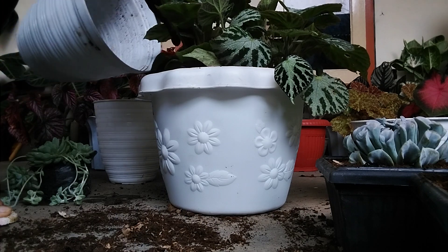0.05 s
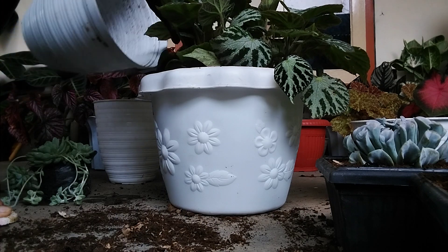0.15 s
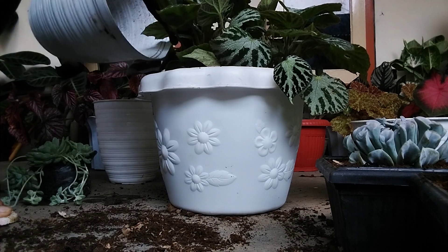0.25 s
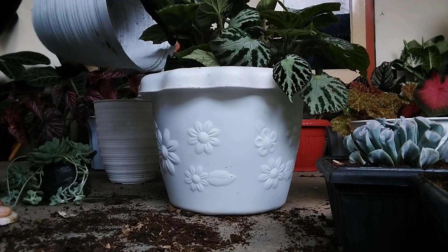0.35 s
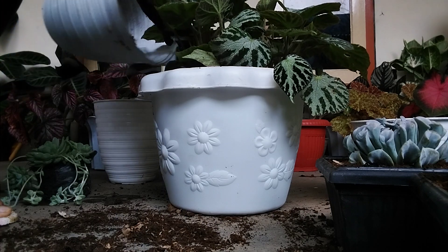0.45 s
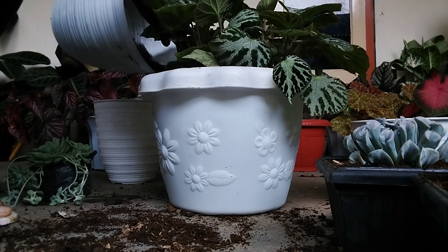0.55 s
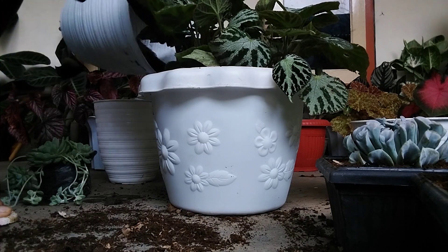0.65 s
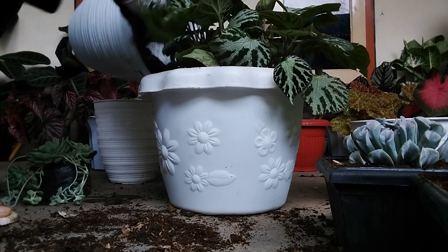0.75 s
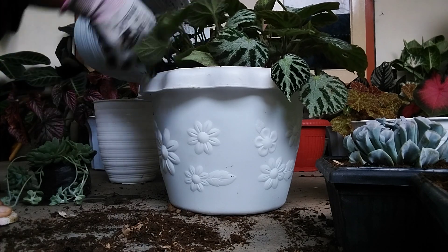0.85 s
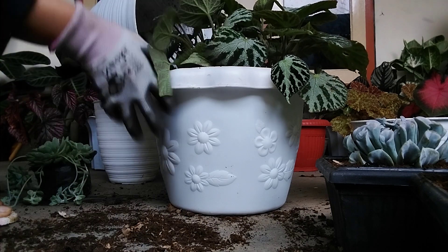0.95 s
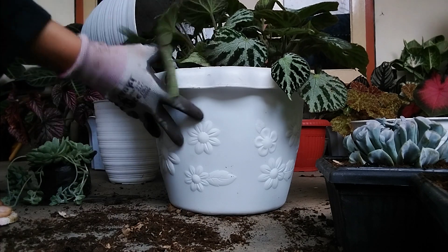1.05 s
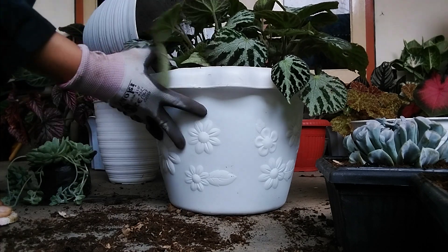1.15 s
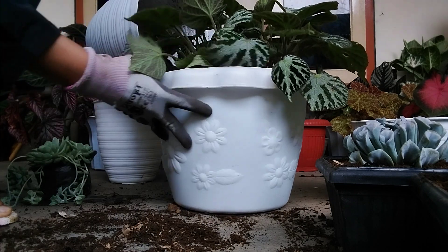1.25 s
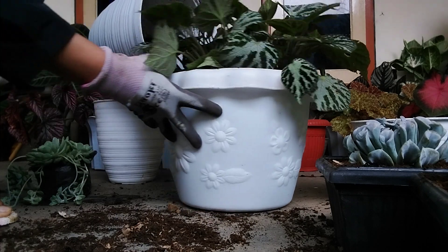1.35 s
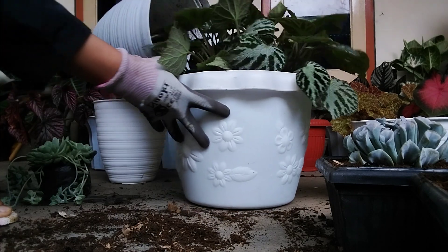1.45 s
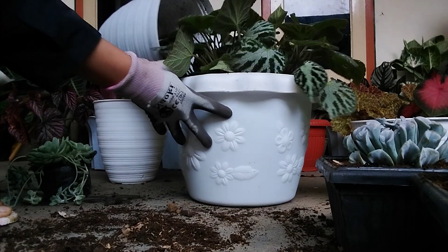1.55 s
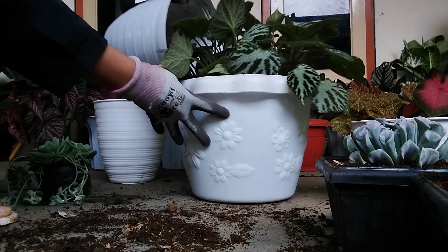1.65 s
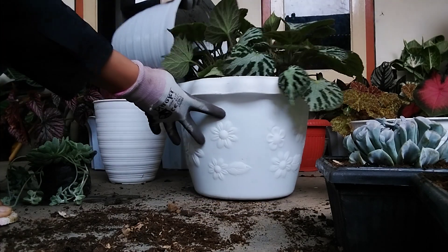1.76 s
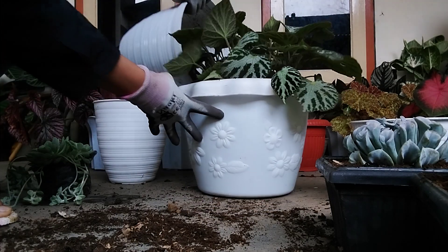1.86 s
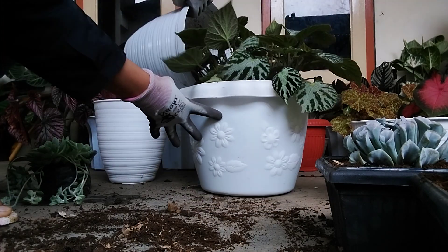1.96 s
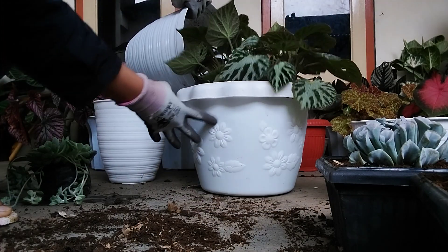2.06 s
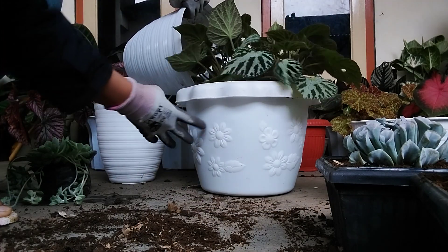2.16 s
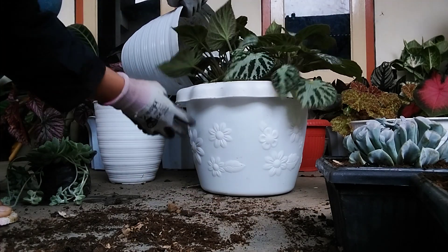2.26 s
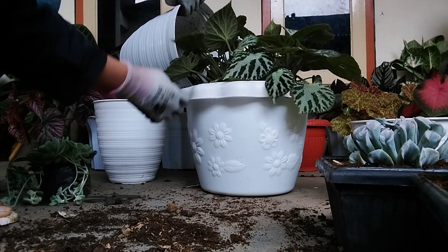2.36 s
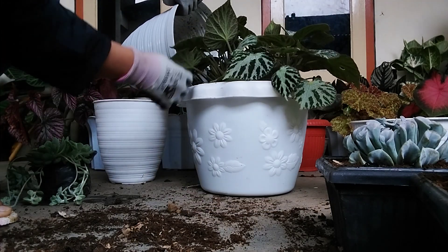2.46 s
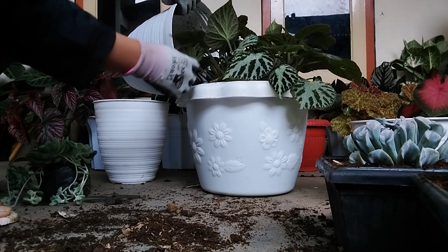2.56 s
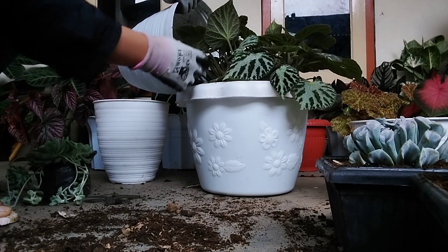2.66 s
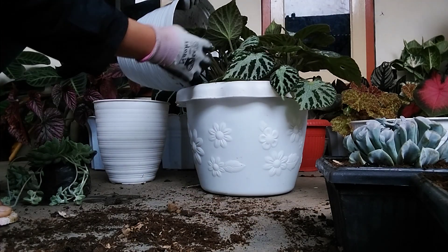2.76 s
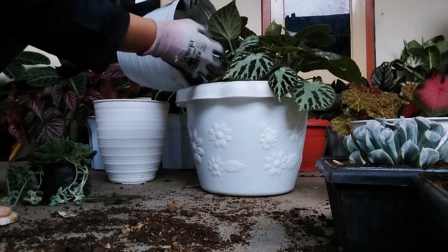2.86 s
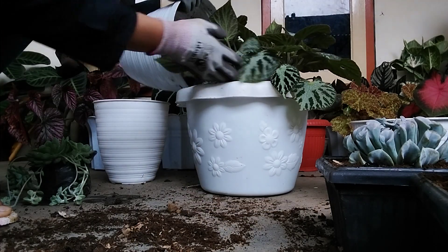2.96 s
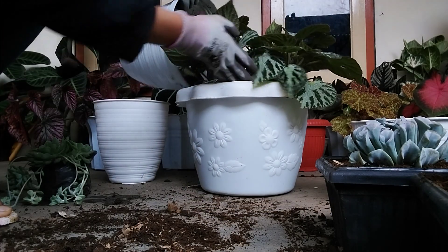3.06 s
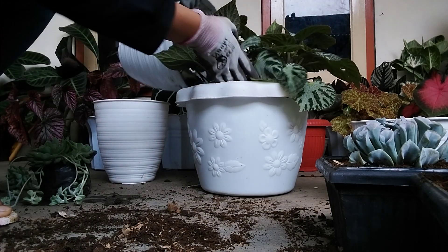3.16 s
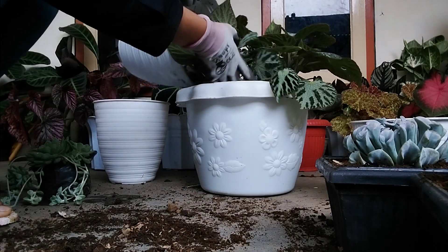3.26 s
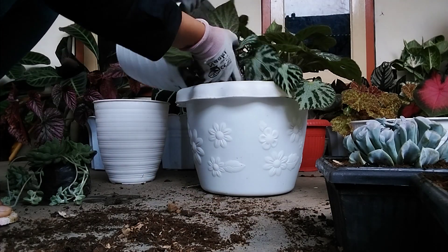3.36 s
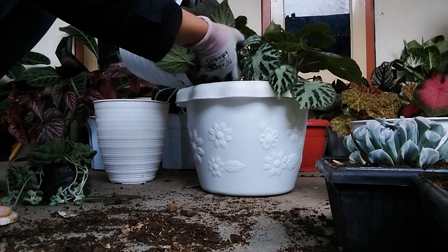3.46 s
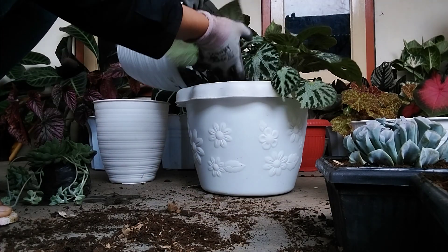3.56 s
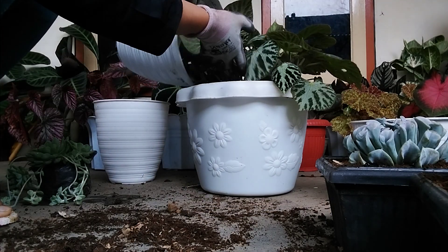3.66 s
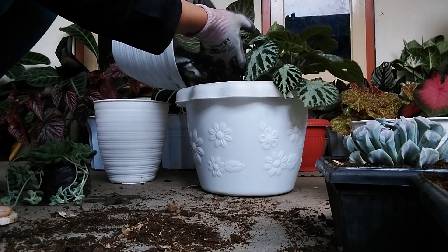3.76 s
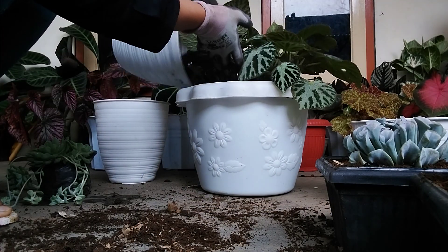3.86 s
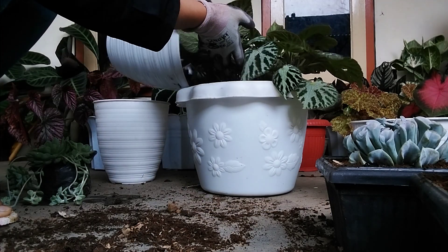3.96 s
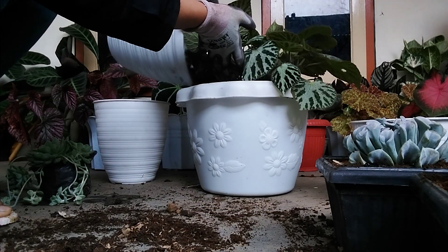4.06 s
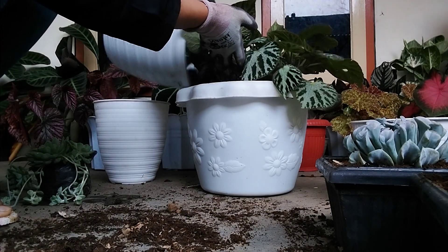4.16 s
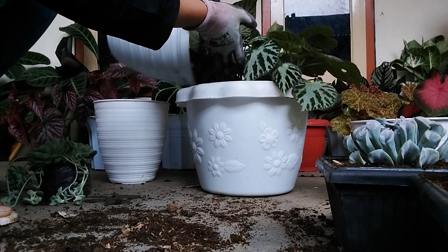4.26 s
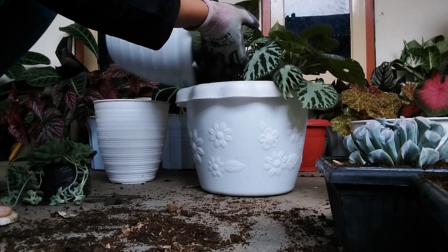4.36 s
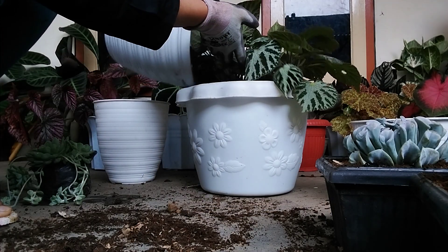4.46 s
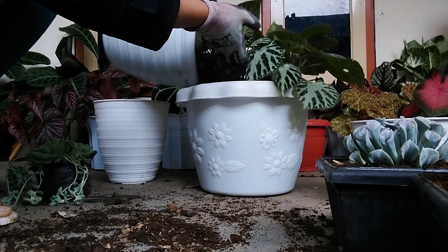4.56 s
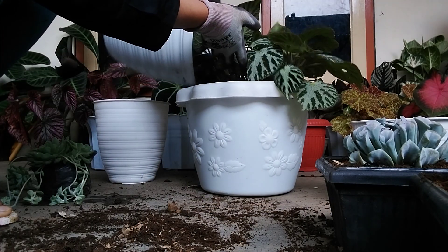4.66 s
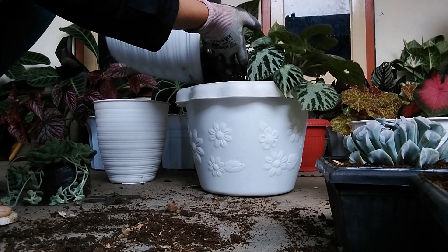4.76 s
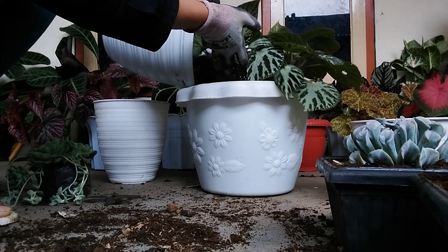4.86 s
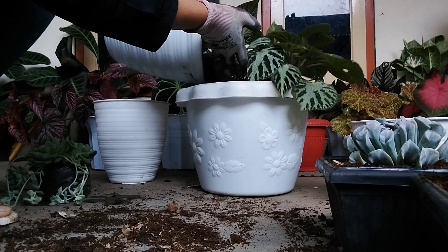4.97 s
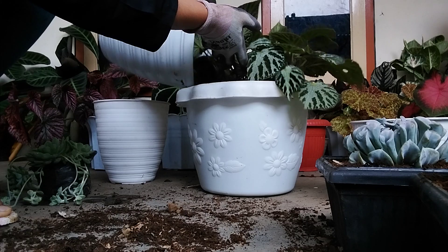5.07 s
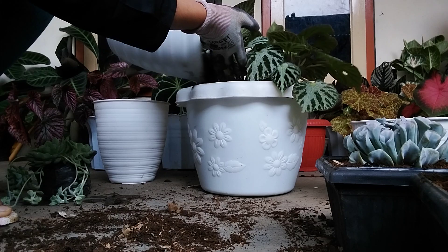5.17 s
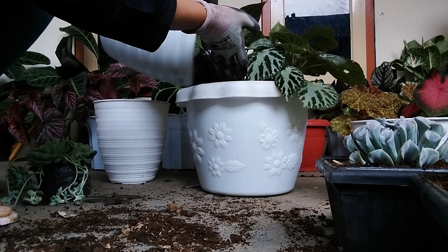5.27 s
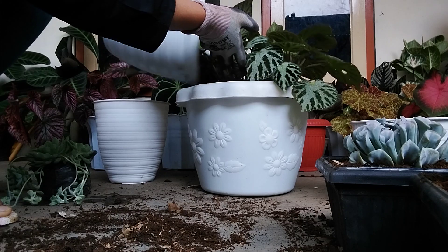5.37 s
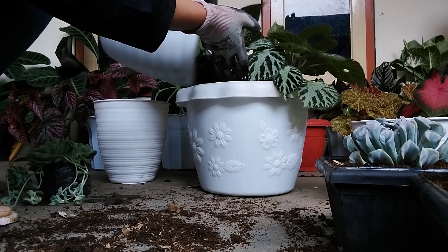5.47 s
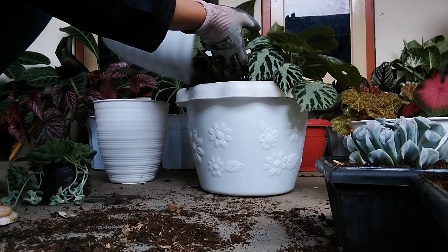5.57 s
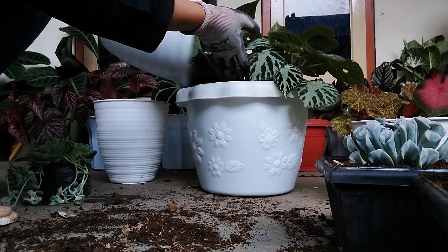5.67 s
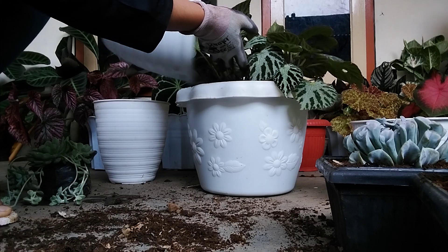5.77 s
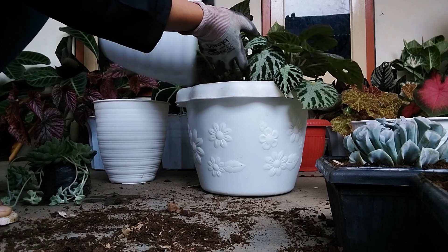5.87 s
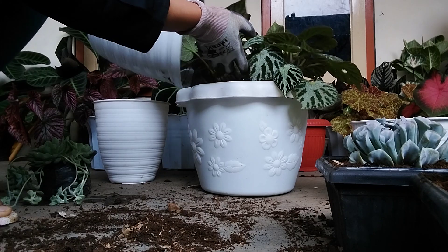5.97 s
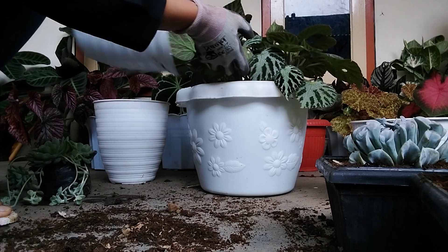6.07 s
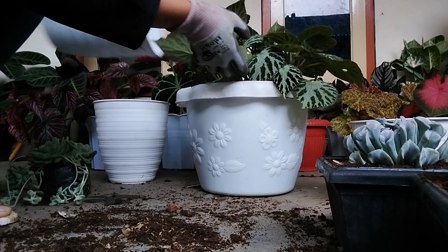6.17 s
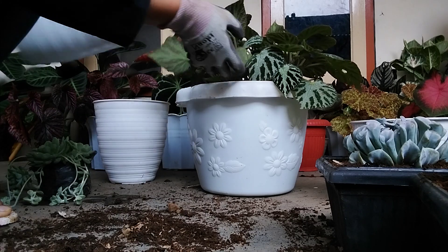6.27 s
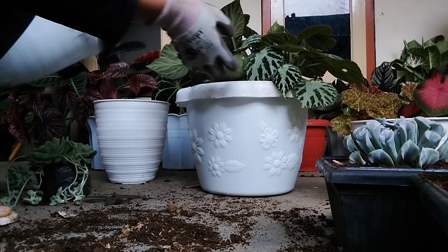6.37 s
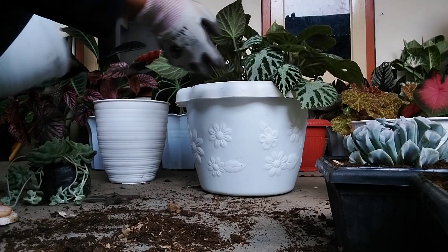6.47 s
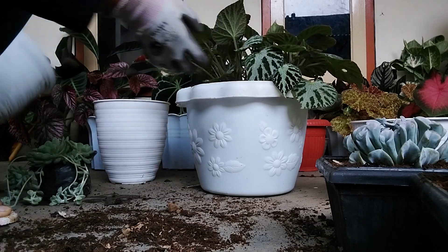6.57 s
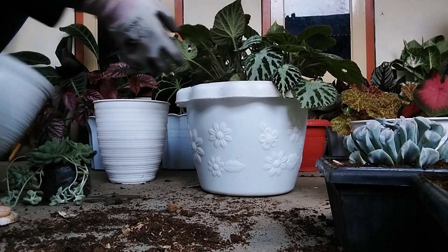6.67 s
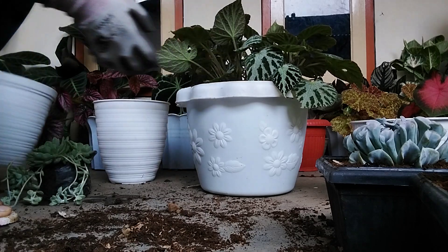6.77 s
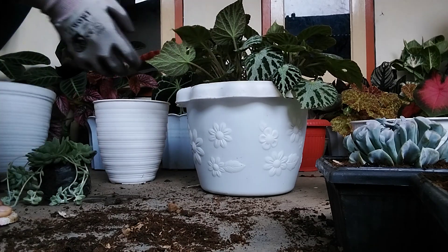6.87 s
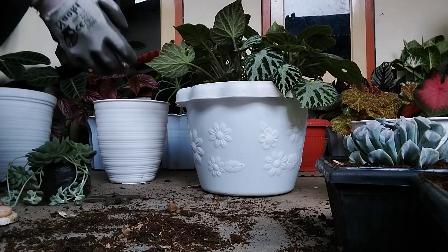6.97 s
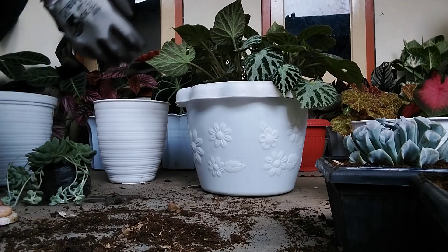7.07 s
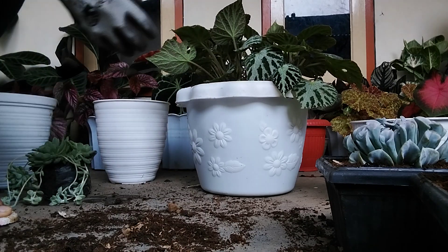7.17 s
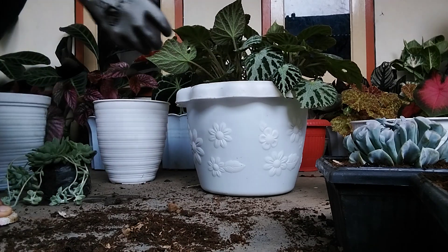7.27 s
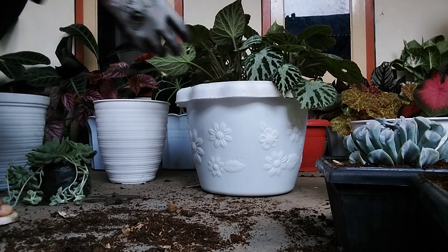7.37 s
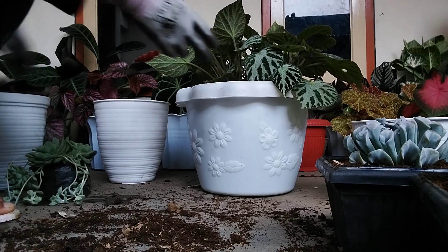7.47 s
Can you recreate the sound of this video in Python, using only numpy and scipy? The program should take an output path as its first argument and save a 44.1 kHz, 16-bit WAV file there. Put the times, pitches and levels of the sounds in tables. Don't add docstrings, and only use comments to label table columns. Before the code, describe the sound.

Quiet repotting heard close, in wide stereo. A few soft pats and crumbs come first, over faint air and swelling motor hum. Then a loud gritty scrape with sharp cracks and a hollow low body, under a second long. A pause, then about fifteen uneven, padded plastic thumps, each followed by trickling soil and rustling. It ends with several hollow knocks as an empty pot lands on grit and wobbles, with a short porch echo.

```python
import sys
import numpy as np
from scipy import signal
from scipy.fft import rfft, irfft
from scipy.io import wavfile

SR = 44100
rng = np.random.default_rng(int(sys.argv[2]) if len(sys.argv) > 2 else 0)


def to_linear_factor(level_db):
    exponent = np.asarray(level_db, float) / 20
    return 10 ** exponent


def to_wav(sig):
    pcm = np.clip(np.atleast_2d(sig), -1, 1) * 32767
    pcm = np.round(pcm).astype(np.int16)
    wavfile.write(sys.argv[1], SR, pcm.T)


N = 331191

# f/Hz, density level/dB
AIR = [(15, -68.5), (25, -46.5), (53, -18), (105, -10), (131, -27), (171, -19), (507, -41.5), (972, -47.5),
       (3870, -54.5), (11800, -46), (16300, -60)]
# t/s, level/dB
HUM = [(0.0, -74), (0.33, -55.5), (1.29, -60), (1.52, -45.5), (1.59, -51), (1.98, -47.5), (2.42, -54),
       (2.71, -74), (3.59, -50.5), (4.13, -65), (4.2, -57), (4.66, -54), (5.1, -86), (5.26, -57.5),
       (5.87, -65.5), (7.04, -61), (7.31, -48), (7.5, -53)]
HUM_TONES = 69.5, 98.5
# t/s, level/dB
HANDS = [(0, -68.5), (.36, -77), (.8, -72.5), (1.25, -71), (2.2, -74), (2.45, -91), (2.97, -92.5),
         (3.02, -70.5), (3.78, -75.5), (4.2, -78), (4.6, -68.5), (5.07, -75.5), (5.5, -65), (6.0, -71.5),
         (6.3, -80), (6.7, -73), (7.0, -71.5), (7.51, -71)]
# peak t/s, 20 dB fade t/s, fine grit level/dB, leaf level/dB, crumb level/dB
BRUSHES = [(.41, .1, -77, -63.5, -87), (.52, 0.13, -54, -51, -64.5), (0.7, 0.1, -58, -52, -66),
           (.91, 0.27, -56.5, -60.5, -82), (1.19, .08, -71, -75, -67), (2.36, 0.1, -85, -84, -78),
           (2.6, 0.3, -95, -96, -77.5), (3.27, .16, -60.5, -69, -63), (3.47, 0.05, -64, -64, -64),
           (4.04, 0.08, -64.5, -74, -86), (4.25, .06, -58.5, -65, -74), (4.468, 0.07, -62, -58, -72),
           (4.66, 0.28, -70, -60.5, -67), (4.9, 0.14, -65, -63, -68), (5.35, 0.2, -59.5, -57.5, -57),
           (5.54, 0.16, -61, -60.5, -62.5), (5.67, 0.12, -61, -55, -60), (5.849, 0.15, -70.5, -60.5, -73.5),
           (6.346, 0.24, -77.5, -81, -92), (6.43, 0.11, -75, -71, -65), (6.79, 0.17, -69, -75.5, -73),
           (6.93, 0.08, -67, -69, -75.5)]
# level re tap/dB, 20 dB fade t/s
TRICKLE = [
    (-31.5, 0.1539),
    (-25, 0.08),
    (-19, 0.26),
    (-15, 0.26),
]
# f/Hz, density level/dB
FINE = [(1760, -18), (3000, -6.5), (3310, -14), (3580, -3), (4750, -2.5), (6870, -6.5), (8620, -8.5),
        (11200, -1), (15200, -13.5), (16300, -39.5)]
# f/Hz, density level/dB
CRUMBS = [(350, -24), (600, -10.5), (834, -17), (1290, -3), (1440, -4), (1950, -12.5), (2410, -1),
          (2980, -16.5), (4500, -27.5), (5850, -38.5), (9900, -120)]
# f/Hz, density level/dB
LEAVES = [(1500, -20), (2300, 3.5), (3600, -6.0), (5200, -21.5)]
MURMUR = [(100, -38.0), (150, 3), (210, 0), (350, 3.5), (480, -11), (700, -38.5)]
# t/s, peak level/dB, pan/dB
FAINT_CRUMBS = [(.0443, -54, -1), (.0897, -55, -2), (.287, -52, 2), (.3955, -50, 1), (.409, -54, 1),
                (.4599, -49, 0), (1.2416, -48, 0), (3.2014, -51, 0), (3.6329, -48, -2), (4.1537, -51, -6),
                (4.8546, -52, -3), (5.3949, -43, -3), (5.4582, -46, -3), (5.468, -48, -3),
                (5.4842, -43, -1), (5.506, -48, -3), (5.673, -42, -2), (6.3398, -56, -3), (6.4251, -57, -1),
                (6.695, -57, -2), (6.7244, -52, -3), (7.0911, -41, 4), (7.0986, -37, 3), (7.2767, -40, 0)]
# t/s, peak level/dB, pan/dB
CLEAR_CRUMBS = [(0.1710, -39, 2), (0.1989, -51, 5), (0.2193, -37, 6), (0.2364, -34, 6), (0.5018, -39, 5),
                (0.5154, -30, 1.5), (0.6384, -44, 4), (0.651, -28, 3), (0.709, -40, 3), (0.87, -41, -14),
                (1.263, -36, 5),
                (2.992, -44, -4), (3.0193, -32.5, 3), (3.4196, -22, 5), (3.835, -40, 3), (3.854, -36.5, 5),
               (4.0638, -41, 0), (4.2764, -28.5, -9), (4.4995, -40, -5), (4.592, -50, -9),
               (4.6915, -28, -3), (4.7758, -33, -8), (4.9344, -39, 2), (5.1428, -30, 2),
               (5.1642, -37.5, -9), (5.3967, -68, -14), (5.592, -32, 4), (5.6172, -33.5, -10.5),
               (5.6609, -41, -6), (5.822, -38, -6), (6.0241, -28.5, -4), (6.6174, -55, 1), (6.63, -42, -7),
               (6.7633, -49, -6), (6.9183, -40, -7), (7.0766, -40.5, 5)]
# t/s, slap level/dB, thump level/dB, knock
# level/dB, wall pitch f/Hz
NUDGES = [
    (0.172, -36.5, -52, -43, 230),
    (0.2184, -34.5, -50, -57, 308),
    (0.4842, -45.5, -56, -70, 227),
    (0.5146, -53, -55.5, -74, 370),
    (0.652, -60, -56, -55, 240),
    (0.8724, -35, -38, -35, 237),
    (0.9213, -43, -38.5, -46, 232),
    (1.1627, -68, -52.5, -56.5, 210),
    (2.195, -73, -50, -79, 263),
]
# t/s, slap level/dB, thump level/dB, knock level/dB, wall pitch f/Hz
TAPS = [(2.9915, -50, -44, -43, 288), (3.018, -32.5, -46.5, -52, 278), (3.2019, -47, -35, -42, 318),
        (3.4184, -21, -28, -29, 359), (3.4345, -31, -34.5, -29, 380), (3.6334, -35, -28.5, -42, 292),
        (3.854, -28.5, -28, -29, 271), (4.0644, -26.5, -29.5, -30.5, 270), (4.275, -22, -27.5, -31, 322),
        (4.4991, -39.5, -35, -47, 295), (4.6916, -35, -37.5, -46, 350), (4.7767, -42.5, -61, -56.5, 340),
        (4.9361, -34, -42.5, -65, 330), (5.143, -26, -33, -36.5, 356), (5.5931, -27, -39, -36, 369),
        (5.9242, -48, -53, -49, 385), (6.025, -27.5, -40.5, -37, 360), (6.0399, -31.5, -32.5, -37.5, 270)]
# f/Hz, level/dB, t60/s
WALL = [(1178, 10.5, 0.032), (1400, -6, 0.0097), (2080, -17, 0.013), (2227, 11.5, 0.023), (2430, 8, 0.017),
        (3410, 3, 0.0053), (4830, -17, 0.0079)]
# t/s, peak level/dB, pitch f/Hz
REBOUNDS = [(.184, -50, 253), (.664, -44, 400), (3.213, -40, 300), (3.644, -28, 300), (3.867, -31, 330),
            (4.075, -28, 300), (4.292, -25, 340), (4.4995, -32, 330), (4.511, -31, 310), (4.706, -34, 300),
            (4.945, -38, 260), (5.159, -30, 370), (5.232, -40, 340), (5.304, -45, 358), (5.395, -44, 250),
            (5.608, -36, 377), (6.074, -32, 280), (6.115, -38, 260)]
# t/s, level/dB
DRAG = [
    (1.288, -37.5),
    (1.36, -36),
    (1.45, -36.5),
    (1.5, -30),
    (1.76, -31),
    (1.85, -34.5),
    (1.875, -28),
    (2.075, -35),
    (2.2, -65.5),
]
# f/Hz, density level/dB
SLIPS = [(60, -18.5), (200, -0.5), (800, -3), (3000, -8.5)]
# f/Hz, width/Hz, level/dB
BIG_POT = [(42, 30, -14), (132, 55, -9.5), (197, 40, -11), (260, 50, -9), (350, 70, -11), (500, 130, -12.5),
           (670, 130, -8), (1053, 260, -16.5), (1403, 160, -17.5)]
# f/Hz, density level/dB
GRIT = [(880, -42), (1500, -11), (1610, -12.5), (1740, -9), (2420, -4), (3800, -9), (5020, -5), (6700, -5),
        (7630, -0.5), (8690, -9), (11500, 1), (15200, -7), (16300, -25)]
# t/s, peak level/dB, pan/dB
CRACKS = [(1.289, -14, 5), (1.3226, -21.5, -0.5), (1.3383, -27.5, -0.5), (1.3477, -17, 8.5),
          (1.3628, -11.5, 1.5), (1.3664, -26.5, -7.5), (1.4196, -20, -6), (1.4744, -19, -1),
          (1.4825, -14.5, 1), (1.488, -14, 1.5), (1.7374, -17, -4), (1.742, -13, -6), (1.7705, -17, -3.5),
          (1.7837, -18, -3.5), (1.8597, -25, 2), (1.8682, -8, -3), (1.8723, -21.5, -7.5),
          (1.8824, -21.5, 2.5), (1.888, -17.5, -9.5), (1.8948, -16, 3.5), (1.9032, -7, -2.5),
          (1.9064, -10.5, -3), (1.924, -17, -5), (1.9629, -26, 1), (1.975, -19, -4), (1.9863, -17, 9),
          (2.0635, -23, -5)]
# t/s, level/dB
JERKS = [(1.34, -36), (1.41, -37), (1.455, -33), (1.49, -29), (1.555, -28), (1.585, -28), (1.62, -29),
         (1.66, -28), (1.72, -27), (1.785, -28), (1.872, -26), (1.912, -27), (1.95, -28), (2.05, -30),
         (2.08, -39)]
# t/s, f/Hz
BELLY = [(1.3, 245), (1.4, 266), (1.5, 263), (1.56, 268), (1.8, 262), (1.87, 252), (1.96, 255), (2.05, 284),
         (2.2, 270)]
# t/s, peak level/dB, pan/dB
CRUSHES = [(1.4874, -27, 0), (1.5243, -26, 0), (1.565, -28, 0), (1.594, -27, 0), (1.647, -22, 0),
           (1.7363, -30, 0), (1.8675, -26, 0), (1.9018, -19, 0), (1.9314, -25, 0), (1.9728, -29, 0)]
# peak t/s, 20 dB fade t/s, level/dB, f/Hz
SQUEAKS = [
    (2.36, .09, -82, 2280),
    (2.61, .1, -88, 1430),
    (6.435, .05, -68, 1130),
    (7.41, .08, -52, 1400),
]
# t/s, level/dB
SCUFF = [(7.07, -76), (7.1, -49), (7.122, -45), (7.154, -63), (7.215, -39.5), (7.256, -50.5), (7.41, -48),
         (7.492, -61.5), (7.51, -46)]
# f/Hz, density level/dB
SCUFF_COLOUR = [(530, 4), (900, -4.5), (1620, -13.5), (1910, -19), (2340, -9), (2970, -14.5), (3120, -10.5),
                (4160, -7), (4860, -9.5), (9000, -19), (11700, -58), (19800, -120)]
# t/s, delay/ms, echo share
TILT = [
    (7.13, .45, .3),
    (7.17, .85, .7),
    (7.245, .55, .7),
    (7.28, .42, .15),
]
# t/s, peak level/dB, lowest mode level/dB, free ringing t/s, pitch share
SET_DOWN = [(7.1167, -12, -5, .02, 1.0), (7.152, -25, -8, .016, 1.1), (7.191, -25, -12, .008, .97),
            (7.202, -24, -20, .013, 1.05), (7.226, -31, -20, .015, 1.0), (7.2572, -12, -9, .029, 1.0),
            (7.308, -27, -8, .015, 1.07), (7.332, -27, -8, .012, .95), (7.35, -23, -25, .012, 1.0),
            (7.362, -19, -15, .01, 1.0), (7.3735, -14, -6, .014, 1.0), (7.4, -26, -12, .015, 1.03),
            (7.48, -33, -10, .015, 1.0)]
# f/Hz, level/dB, t60/s
SMALL_POT = [(232, 0.5, 0.11), (345.8, 4.5, 0.18), (385, -15, 0.022), (620, -14, .05), (930, -19, 0.04)]
# f/Hz, t60/s
PORCH = [(100, 0.74), (250, 0.41), (600, 0.36), (1500, 0.35), (4000, 0.35), (11000, 0.31)]
# f/Hz, likeness
LIKENESS = [(60, .93), (250, 0.87), (500, .96), (1000, .35), (3000, 0.041), (12000, 0.027)]
# f/Hz, left minus right level/dB
PORTS = [(60, -2.3), (250, -1.8), (700, -1.5), (2300, -3.5), (3500, -1), (5500, 3.5), (10500, -10),
         (14500, 0)]


def in_time(rows, outside=None):
    s, *columns = np.transpose(rows)
    return [np.interp(np.arange(N) / SR, s, column, outside, outside) for column in columns]


def at_hz(points, hz):
    known_hz, value = np.array(points).T
    return np.interp(np.log(hz), np.log(known_hz), value)


def bins_hz(n):
    return np.maximum(np.fft.rfftfreq(n, 1 / SR), 1)


def rms_one(x):
    return x / np.sqrt(np.mean(x ** 2) + 1e-20)


def decay(t, t60):
    return to_linear_factor(-60 * t / t60)


def lay(out, s, sound):
    at = round(s * SR)
    out[..., at:at + sound.shape[-1]] += sound


def drift(rate):
    r = np.exp(-2 * np.pi * rate / SR)
    slow = signal.lfilter([1], [1, -2 * r, r * r], rng.standard_normal(N + SR))
    return rms_one(slow[SR:])


def band_pass(x, low_hz, high_hz):
    return signal.sosfilt(signal.butter(2, [low_hz, high_hz], "band", fs=SR, output="sos"), x)


def shape(x, spectrum):
    n = x.shape[-1]
    return rms_one(irfft(rfft(x) * to_linear_factor(at_hz(spectrum, bins_hz(n))), n)) * np.std(x)


def colour(x, spectrum):
    n = x.shape[-1]
    alike = np.clip(at_hz(LIKENESS, bins_hz(n)), 0, 1)
    mid, side = rfft(x) * to_linear_factor(at_hz(spectrum, bins_hz(n)))
    both = np.sqrt(1 + alike) * mid + np.sqrt(1 - alike) * side * [[1], [-1]]
    return rms_one(irfft(both, n))


def grains(per_s, spread_db, smooth):
    struck = rng.random(N) < per_s / SR
    sizes = to_linear_factor(spread_db * np.minimum(rng.exponential(1, N), 4)) * struck
    envelope = rms_one(signal.lfilter([1], [1, -decay(1 / SR, 0.028)], sizes))
    return rng.standard_normal((2, N)) * (smooth + envelope)


def swells(s, db, rise_s, fall_s):
    steps = np.arange(0, N + 32, 32)
    t = steps[:, None] / SR - s
    power = to_linear_factor(db - 20 * np.where(t < 0, -t / rise_s, t / fall_s)) ** 2
    return np.interp(np.arange(N), steps, np.sqrt(power.sum(axis=1)))


def snaps(rows, t60):
    t = np.arange(int(.02 * SR)) / SR
    out = np.zeros((2, N + SR))
    for s, db, pan_db in rows:
        burst = rng.standard_normal((2, len(t))) * decay(t, t60)
        lay(out, s, to_linear_factor(db) * to_linear_factor([[pan_db / 2], [-pan_db / 2]]) * burst)
    return out[:, :N]


def wavering(hz, width_hz):
    phase = 2 * np.pi * np.cumsum(hz + width_hz * drift(width_hz)) / SR
    return to_linear_factor(2.5 * drift(width_hz)) * np.sin(phase)


def background():
    t = np.arange(N) / SR
    out = to_linear_factor(-63) * colour(rng.standard_normal((2, N)), AIR)
    swell_db, = in_time(HUM)
    for hz, level_db in zip(HUM_TONES, [swell_db, swell_db - 3]):
        phase = 2 * np.pi * (hz * t + np.cumsum(1.5 * drift(2.4)) / SR)
        out = out + to_linear_factor(level_db + 2.5 + 1.6 * drift(3.6)) * np.sin(phase)
    return out


def rustle():
    busy_db, = in_time(HANDS)
    at, fade_s, fine_db, leaf_db, crumb_db = np.transpose(BRUSHES)
    s, slap_db, thump_db, knock_db, _ = np.transpose(NUDGES + TAPS)
    hands_below_db = [0, -11, -10.5, -2.5]
    brushes_db = [fine_db, leaf_db, crumb_db, crumb_db + 1]
    taps_db = [slap_db, slap_db, knock_db, thump_db]
    jolt_s, swing_s, swing_db = 0.005, 0.04, -11
    gains = []
    for below_db, brush_db, tap_db, (loss_db, fall_s) in zip(hands_below_db, brushes_db, taps_db, TRICKLE):
        brush = swells(at, brush_db, 0.62 * fade_s, fade_s)
        trickle = swells(s, tap_db + loss_db, jolt_s, fall_s)
        swing = swells(s, tap_db + loss_db + swing_db, swing_s, jolt_s)
        gains.append(to_linear_factor(busy_db + below_db) + brush + trickle + swing)
    fine_gain, leaf_gain, crumb_gain, wall_gain = gains
    fine = colour(grains(per_s=260, spread_db=0.0, smooth=1.0), FINE)
    rough = grains(per_s=210, spread_db=2.0, smooth=0.7)
    crumbs = band_pass(colour(rough, CRUMBS), 450, 1400)
    leaves = colour(rough[::-1], LEAVES)
    coarse = leaf_gain * leaves + crumb_gain * crumbs
    wall = colour(rng.standard_normal((2, N)), MURMUR)
    return fine_gain * to_linear_factor(0.8 * drift(7.1)) * fine + to_linear_factor(0.5 * drift(4.7)) * coarse + wall_gain * wall


def single_crumbs():
    faint = shape(snaps(FAINT_CRUMBS, t60=0.012), FINE) * to_linear_factor(-7.0)
    clear = shape(snaps(CLEAR_CRUMBS, t60=0.016), FINE) * to_linear_factor(-9.5)
    return faint + clear


def taps():
    t = np.arange(int(.15 * SR)) / SR
    out = np.zeros(N + SR)
    for s, slap_db, thump_db, knock_db, hz in NUDGES + TAPS:
        thump = sum(to_linear_factor(db) * np.cos(2 * np.pi * hz * ratio * t) * decay(t, t60)
                    for ratio, db, t60 in [(.62, -3.5, 0.061), (1.0, 8, 0.042), (1.4, -10.5, 0.048)])
        thump = -thump * np.clip(t / 0.0028, 0, 1)
        stretch = 1 + 0.05 * rng.standard_normal()
        slap = 0
        for luck, (f, db, t60) in zip(rng.standard_normal(len(WALL)), WALL):
            mode = np.sin(2 * np.pi * f * (stretch + 0.02 * luck) * t)
            slap = slap + to_linear_factor(db + 2.0 * luck) * mode * decay(t, t60)
        low, middle, high = rng.standard_normal((3, len(t)))
        soil = (to_linear_factor(thump_db + 17.5) * band_pass(low * decay(t, 0.16), 120, 348)
                + to_linear_factor(knock_db + 3) * band_pass(middle * decay(t, 0.14), 750, 1460)
                + to_linear_factor(slap_db - 1.5) * band_pass(high * decay(t, 0.06), 1094, 2300))
        lay(out, s, to_linear_factor(thump_db + 1.0) * thump + to_linear_factor(slap_db - 18) * slap + soil)
    return band_pass(out[:N], 85, 9000)


def rebounds():
    t = np.arange(int(.1 * SR)) / SR
    out = np.zeros(N + SR)
    for s, db, hz in REBOUNDS:
        ring = sum(to_linear_factor(mode_db) * np.sin(2 * np.pi * hz * ratio * t)
                   for ratio, mode_db in [(1, 0), (1.45, -13.0), (.6, -1.5)])
        lay(out, s, to_linear_factor(db) * decay(t, .06) * np.clip(t / .002, 0, 1) * ring)
    return band_pass(out[:N], 90, 3000)


def body(x):
    out = 0
    for k, (hz, width, db) in enumerate(BIG_POT):
        r = np.exp(-np.pi * width / SR)
        zeros = [(1 - r * r) / 2, 0, (r * r - 1) / 2]
        poles = [1, -2 * r * np.cos(2 * np.pi * hz / SR), r * r]
        out = out + (-1) ** k * to_linear_factor(db) * signal.lfilter(zeros, poles, x)
    return rms_one(out)


def patchy(x, depth_db, rate):
    edges = np.geomspace(1000, 19000, 7)
    out = 0
    for k, (low, high) in enumerate(zip(edges, edges[1:])):
        out = out + (-1) ** k * to_linear_factor(depth_db * drift(rate)) * band_pass(x, low, high)
    return out


def drag():
    t = np.arange(N) / SR
    hiss_db, = in_time(DRAG, outside=-150)
    going = np.clip((t - DRAG[0][0]) / .12, .17, 1) * (hiss_db > -140)
    stop_db = 194 * np.maximum(t - DRAG[-2][0], 0)
    rumble_db = -30 + 0.59 * (hiss_db + 32.5) - stop_db
    slips = colour(grains(per_s=320, spread_db=3.5, smooth=4.2), SLIPS)
    rumble = going * to_linear_factor(rumble_db) * body(slips)
    grit = colour(grains(per_s=500, spread_db=2.5, smooth=1.2), GRIT)
    hiss = to_linear_factor(hiss_db - 1.5) * patchy(grit, depth_db=.9, rate=18)
    cracks = band_pass(shape(snaps(CRACKS, t60=0.013), GRIT), 3500, 19000) * to_linear_factor(-5.0)
    return rumble + hiss + cracks


def belly():
    s, db = np.transpose(JERKS)
    pitch_hz, = in_time(BELLY)
    return swells(s, db + 2.5, rise_s=.025, fall_s=.05) * wavering(pitch_hz, width_hz=9)


def crushes():
    return band_pass(snaps(CRUSHES, t60=.02), 1300, 7000)


def squeaks():
    return sum(swells(s, db, fade_s, fade_s) * wavering(hz, width_hz=60) for s, fade_s, db, hz in SQUEAKS)


def scuff():
    press_db, = in_time(SCUFF, outside=-150)
    rough = grains(per_s=1500, spread_db=3.5, smooth=1.5)
    grit = colour(rough, SCUFF_COLOUR)
    delay_ms, share = in_time(TILT)
    late = np.arange(N) - delay_ms * SR / 1000
    grit = grit + share * np.array([np.interp(late, np.arange(N), side) for side in grit])
    low = to_linear_factor(press_db + 12.0) * band_pass(grit, 1210, 3370)
    high = to_linear_factor(press_db + 8.5) * band_pass(grit, 2520, 9100)
    fine = to_linear_factor(press_db - 4) * band_pass(colour(rough, FINE), 6400, 16500)
    return low + high + fine


def set_down():
    t = np.arange(int(.12 * SR)) / SR
    out = np.zeros(N + SR)
    for s, db, low_db, free_s, share in SET_DOWN:
        modes = [to_linear_factor(level_db) * np.sin(2 * np.pi * hz * share * t) * decay(t, t60)
                 for hz, level_db, t60 in SMALL_POT]
        settled = decay(np.maximum(t - free_s, 0), 0.04)
        soft = np.clip(t / 0.0016, 0, 1)
        lay(out, s, -to_linear_factor(db) * soft * settled * (to_linear_factor(low_db) * modes[0] + sum(modes[1:])))
    return band_pass(out[:N], 90, 6000)


def porch(x, wet_db):
    t = np.arange(int(.7 * SR)) / SR
    white = colour(rng.standard_normal((2, len(t))), [(20, 0), (20000, 0)])
    edges = np.geomspace(40, 18000, 10)
    tail = 0
    for low, high in zip(edges, edges[1:]):
        t60 = at_hz(PORCH, np.sqrt(low * high))
        tail = tail + band_pass(white, low, high) * decay(t, t60) / np.sqrt(t60 * SR / 14)
    tail = tail * np.clip(t / 0.011, 0, 1)
    return x + to_linear_factor(wet_db) * signal.fftconvolve(np.atleast_2d(x), tail, axes=1)[:, :N]


def scene():
    around = background() + rustle()
    small_pot = porch(taps() + rebounds(), wet_db=7.0)
    big_pot = drag() + belly() + crushes()
    near = porch(single_crumbs() + big_pot + squeaks() + scuff(), wet_db=-3)
    landing = porch(set_down(), wet_db=0.5)
    return around + small_pot + near + landing


def low_pass(x):
    return signal.sosfilt(signal.butter(12, 16780, fs=SR, output="sos"), x)


def record(dry):
    lean_db = at_hz(PORTS, bins_hz(N)) / 2
    left, right = irfft(rfft(dry) * to_linear_factor([lean_db, -lean_db]), N)
    lag = 4
    ports = np.array([left, np.concatenate([np.zeros(lag), right[:N - lag]])])
    ports = signal.sosfilt(signal.butter(2, 45, "high", fs=SR, output="sos"), ports)
    ports = signal.sosfilt(signal.cheby2(12, 50, 16900, fs=SR, output="sos"), ports)
    return low_pass(ports)


dry = scene()
out = record(dry)
to_wav(out)
```